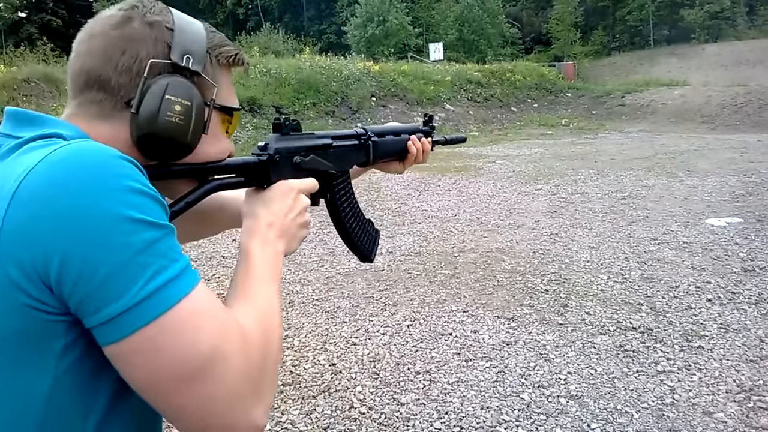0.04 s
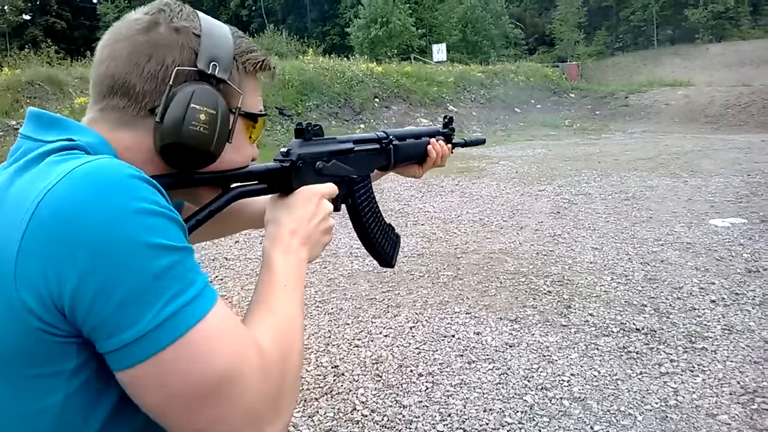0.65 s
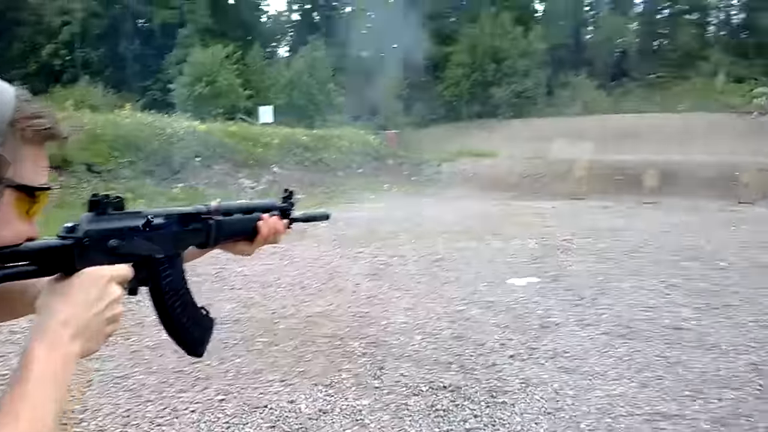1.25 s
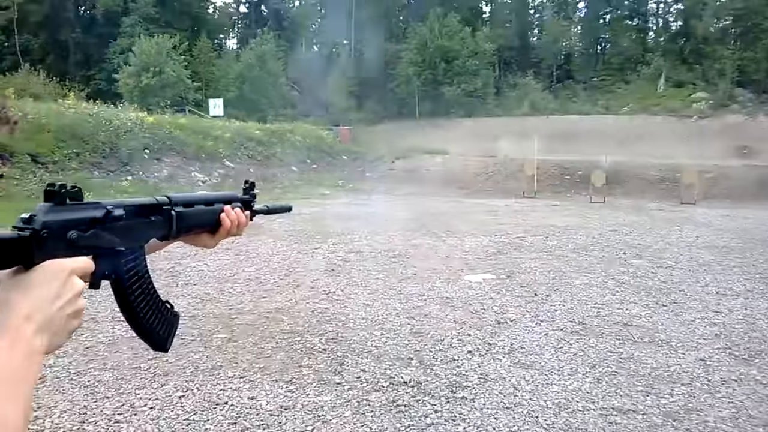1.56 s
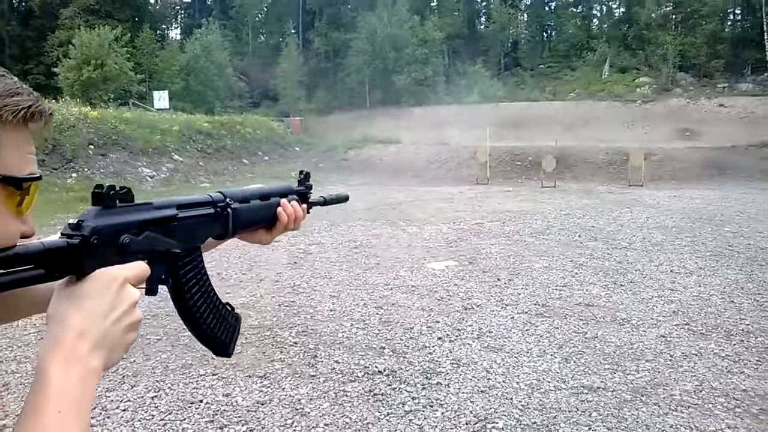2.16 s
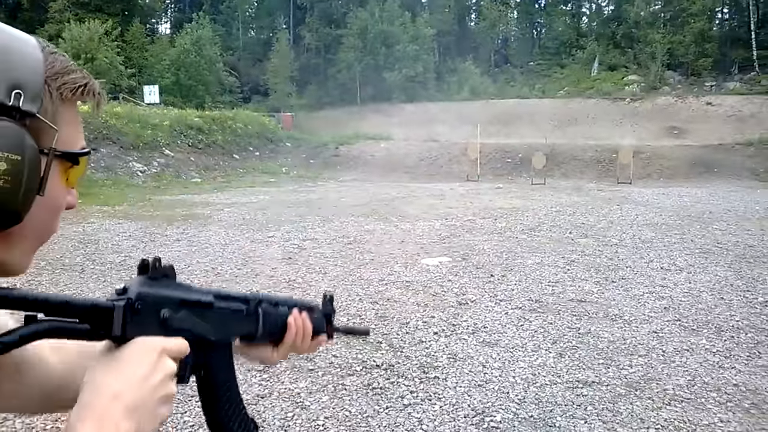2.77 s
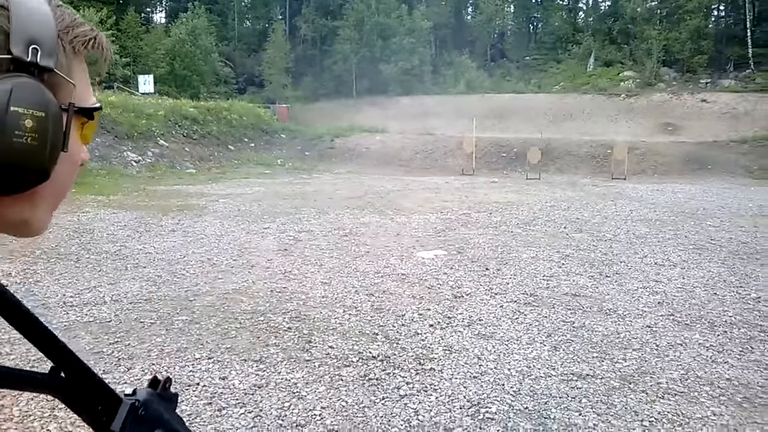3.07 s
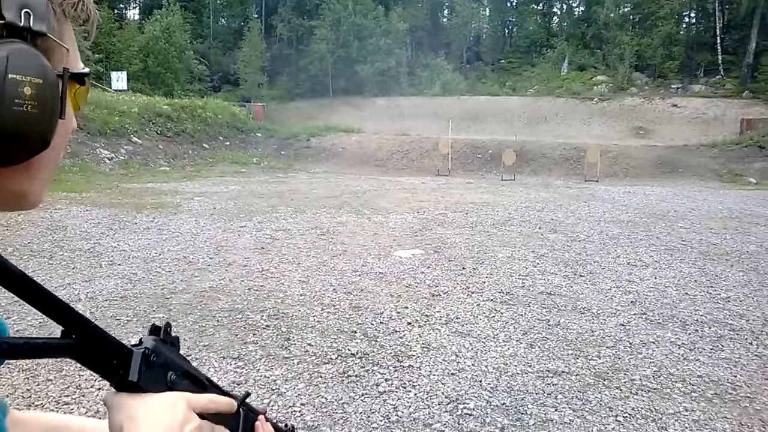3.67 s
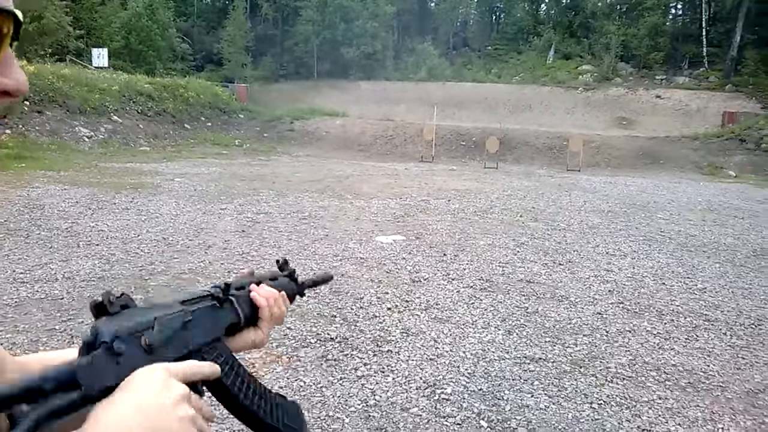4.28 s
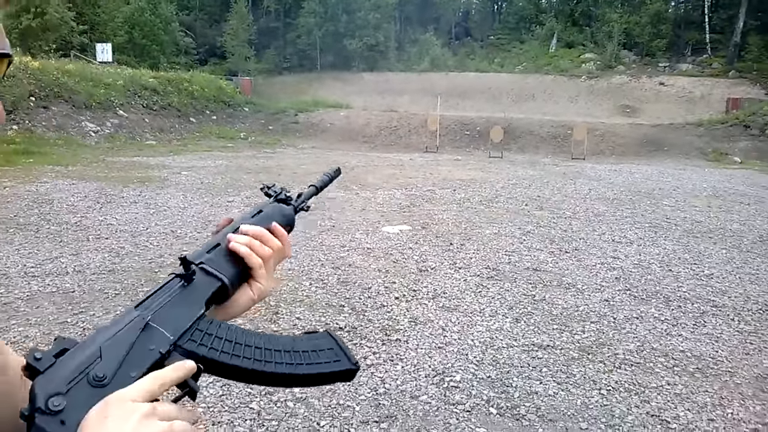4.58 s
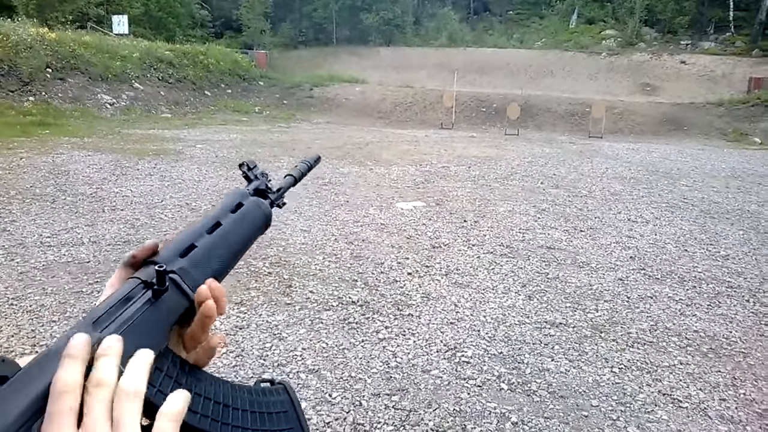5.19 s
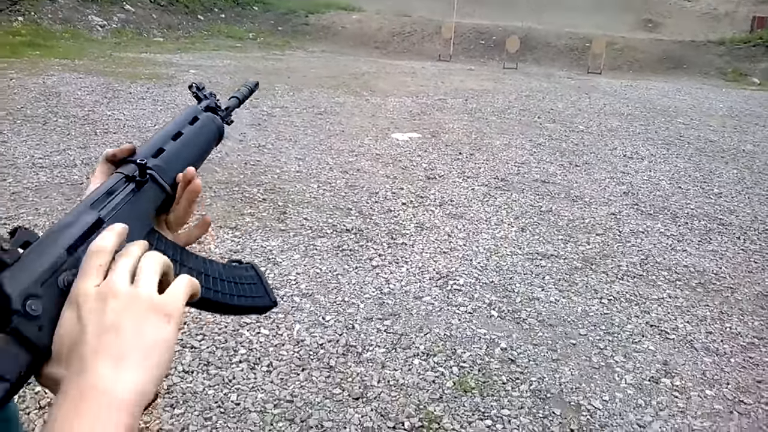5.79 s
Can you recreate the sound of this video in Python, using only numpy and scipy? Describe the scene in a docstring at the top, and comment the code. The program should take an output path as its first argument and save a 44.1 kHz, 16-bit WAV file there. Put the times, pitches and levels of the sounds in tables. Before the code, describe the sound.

Six sharp rifle blasts come in quick succession right next to the microphone, distorting it and echoing from the banks and trees around a gravel range. After the last one there is a knock on the rifle and a faint ring of empty brass landing. The rest is much quieter: hands and sleeves slide over the weapon with light knocks, and a metal lever snaps twice, about a second and a half apart.

```python
"""Six rifle shots on a gravel range, heard from beside the shooter. An earlier shot fades in the trees
as the rifle is shouldered. Each time the hammer falls, the blast overloads the microphone, bounces off
the ground, scatters from gravel and earth banks and rolls back from the forest while the gain recovers.
After the last shot, spent cases tinkle on the gravel. Then the rifle is lowered and handled: hands rub
and knock on it, and a steel lever snaps twice over quiet outdoor air."""
import sys
import numpy as np
from scipy import signal
from scipy.fft import rfft, irfft, next_fast_len
from scipy.io import wavfile
from scipy.ndimage import uniform_filter1d, minimum_filter1d, map_coordinates

SR = 44100
rng = np.random.default_rng(int(sys.argv[2]) if len(sys.argv) > 2 else 0)


def wrap_up_sound(samples):
    """Save the sound to the file named by the first command line argument, as 16-bit audio."""
    columns = np.atleast_2d(samples).T
    # keep every value between -1 and 1, then stretch to whole-number steps
    tamed = np.clip(columns, -1, 1)
    steps = np.round(tamed * 32767).astype(np.int16)
    wavfile.write(sys.argv[1], SR, steps)


N = 266805

# shot cues: t/s, blast/dB, ground bounce/dB, bank scatter/dB, forest echo/dB, hammer/dB
SHOTS = [(.3970, 8, 3.5, 2, -5, -21), (.6420, 5, -3.5, -1, -2, -16), (1.1520, 4, -1, 0, -2.5, -18),
         (1.4550, -3, -9, -4, -5, -16), (1.9123, 3.5, -1.5, -2, -3, -17), (2.3770, -5, -11, -3, -2.5, -13)]
def shots():
    """Each blast and the answer of the range, from near to far."""
    out = np.zeros(N)
    near, far = clock(1), clock(2.3)
    for s, blast_db, ground_db, scatter_db, forest_db, _ in SHOTS:
        add(out, s, amp(blast_db) * muzzle(near) + amp(ground_db) * ground_bounce(near))
        add(out, s, amp(scatter_db) * (banks(near) + sinking_echo(near)))
        add(out, s, amp(forest_db) * forest(far))
    return out


# EQ of the muzzle blast: f/Hz, level/dB
BLAST_EQ = [(59, -38.5), (100, -7), (547, 0.5), (1310, -6), (2080, -0.5), (4870, -8), (5300, -5.5),
            (8460, -18), (10900, -15), (15000, -22.5), (16000, -34)]
def muzzle(t):
    """The ragged pressure front of the muzzle gas."""
    return noise(BLAST_EQ, t) * burst(t, length=.0042)


def ground_bounce(t, lag=.0074, push_s=.00055, swing_hz=48, swing_t60=.055):
    """The gravel returns a rounded blast wave: a short push, a longer suction, a slow swing of air."""
    age = np.maximum(t - lag, 0)
    wave = (1 - age / push_s) * np.exp(-age / push_s / 1.25) * (1 - np.exp(-4 * age / push_s))
    swing = -amp(-18 - 60 * age / swing_t60) * np.sin(2 * np.pi * swing_hz * age)
    return amp(10.5) * wave + swing


# slapbacks from banks and boards: lag/s, level/dB, length/s
SLAPBACKS = [(0.022, -12, .005), (0.0626, 0.5, .0042), (0.068, 0, 0.0046), (0.0946, -8.5, .004),
             (0.104, -8.5, 0.00054), (0.114, -16, .008), (.1305, -1, .0005), (0.1386, -6, 0.00056)]
# EQs of the gravel's hiss and the boom under it: f/Hz, level/dB
GRAVEL_EQ = [(180, -29.5), (300, -0.5), (385, -7.5), (502, -4), (900, -7), (1250, -7), (1360, -7.5),
             (1750, -7.5), (2980, -3), (4160, -6), (4830, -4.5), (6300, -7), (10000, -20), (13300, -19),
             (16000, -30.5)]
BOOM_EQ = [(20, -27), (45, -9), (80, 0), (150, -0.5), (220, -4.5), (320, -1), (400, -7), (520, -2.5),
           (900, -16), (2000, -45.5)]
# their envelopes: peak/s, rise/(dB/s), hold end/s, fall/(dB/s), tail share, tail fall/(dB/s)
HISS_SHAPE = (0.0081, 2100, 0.12, 464, .36, 88)
BOOM_SHAPE = (.009, 800, .122, 250, .26, 60)
def banks(t, side_lag=.06, side_width_s=.017):
    """Countless small reflections with a boom beneath and a few distinct slapbacks on top."""
    swell = np.exp(-((t - side_lag) / side_width_s) ** 2)  # the side bank answers
    slaps = sum(amp(db + 1.7 * rng.standard_normal()) * burst(np.maximum(t - lag, 0), length)
                for lag, db, length in SLAPBACKS)
    hiss_gain = amp(-11.4 + 3.5 * swell + 1.4 * wobble(t, 200)) * envelope(t, HISS_SHAPE)
    hiss = hiss_gain * noise(GRAVEL_EQ, t, grain_db=2.5)
    boom = amp(-22.7 + 4.5 * swell) * envelope(t, BOOM_SHAPE) * noise(BOOM_EQ, t)
    return hiss + boom + slaps * noise(GRAVEL_EQ, t)


def sinking_echo(t, start_hz=300, end_hz=125, centre_s=.21, width_s=.06):
    """Returns from along the bank arrive ever wider apart: a hollow note that sinks."""
    hz = np.interp(t, [.15, .28], [start_hz, end_hz]) * (1 + .17 * wobble(t, 120))
    swell = amp(-34.5 + 2.5 * wobble(t, 70)) * np.exp(-((t - centre_s) / width_s) ** 2)
    return swell * np.sin(2 * np.pi * np.cumsum(hz) / SR)


# EQ of the forest's roll: f/Hz, level/dB
FOREST_EQ = [(100, -23), (300, -15), (430, -6.5), (560, .5), (720, 0), (1000, -5.5), (1500, -4), (2300, -1),
             (3300, -.5), (5500, -4), (7000, -9.5), (8500, -17), (12000, -28), (16000, -39)]
# its envelope: peak/s, rise/(dB/s), hold end/s, fall/(dB/s), tail share, tail fall/(dB/s)
FOREST_SHAPE = (.288, 260, 0.45, 57, .22, 18)
def forest(t, air_loss=4, patchy_db=1.5):
    """The tree line answers with a hollow note; the deeper the path, the more treble the air takes."""
    hz, lag, spectrum = signal.stft(noise(FOREST_EQ, t, grain_db=1), SR, nperseg=512)
    loss_db = air_loss * (hz[:, None] / 1000) ** 1.36 * np.maximum(lag - .38, 0)
    patches = uniform_filter1d(rng.standard_normal(spectrum.shape), size=4, axis=0)
    patches = unit(uniform_filter1d(patches, size=6, axis=1))
    tail = signal.istft(spectrum * amp(patchy_db * patches - loss_db), nperseg=512)[1][:len(t)]
    hollow = noise([(300, -29.5), (500, 0), (720, .5), (1100, -30.5), (3000, -58.5)], t)
    hollow *= amp(-5.5 + 3 * wobble(t, 60)) * np.exp(-((t - .31) / .026) ** 2)
    return (tail + hollow) * envelope(t, FOREST_SHAPE) * amp(-25 + .4 * wobble(t, 40))


# the trigger is let forward and resets: t/s, level/dB
RESETS = [(.5549, -3.5), (.7829, -4.5), (1.7870, -7.5), (2.5519, -5.5)]
# a lever breaks loose and snaps against its stop: t/s, level/dB, magazine send/dB, thud send/dB
LEVER_SNAPS = [(3.8655, -12, -20, -43), (3.8685, -17.5, -19, -39), (5.3967, -39, -8.5, -30),
               (5.4084, -13, -21.5, -35), (5.4106, -9, -12.5, -34)]
def action(hammer_lead_s=.0058):
    """The hammer falls just before each blast, the trigger resets and later the lever snaps."""
    out = np.zeros(N)
    hammers = [(s - hammer_lead_s, db) for s, *_, db in SHOTS]
    for s, db in hammers + list(RESETS):  # shouldered, magazine and stock hardly answer
        add(out, s, amp(db) * steel_hit(magazine_db=-32, thud_db=-36))
    for s, db, magazine_db, thud_db in LEVER_SNAPS:
        add(out, s, amp(db) * steel_hit(magazine_db, thud_db))
    return out


# EQ of the steel's crack: f/Hz, level/dB
STEEL_EQ = [(100, -24), (260, -25), (470, -28), (680, -9.5), (1000, -11), (1350, -15), (2000, -5),
            (3200, -1.5), (4400, -3.5), (5300, 3.5), (6500, 2), (8200, -16), (11500, -17), (16000, -23.5)]
# ring of the steel receiver and the hollow magazine: f/Hz, level/dB, t60/s
RECEIVER_MODES = [(2050, -4, .05), (2400, -4.5, .035), (2510, -3.5, .04), (2610, -9, .06),
                  (3110, -4.5, 0.027), (3860, -2, .03), (4560, -6, 0.027), (5170, 0, 0.027),
                  (5700, -1.5, .035), (6300, 2, .03), (7000, -5.5, 0.035), (11700, -20, .06)]
MAGAZINE_MODES = [(650, -11.5, .03), (744, -5, .04), (865, -4, .05), (930, -5, 0.045), (1007, -4, 0.05)]
def steel_hit(magazine_db, thud_db, crack_t60=.013, wash_t60=.21, thud_t60=.075):
    """Steel meets steel: a crack, a brief ring, a thud in the stock, a bright wash off the gravel."""
    t = clock(.25)
    crack = noise(STEEL_EQ, t, grain_db=2) * amp(1 - 60 * t / crack_t60)
    wash = noise([(1500, -22), (2600, -6), (3500, -10), (5500, 0), (11000, -7.5), (16000, -17)], t)
    wash *= amp(-31.5 - 60 * t / wash_t60)
    thud = noise([(30, -7), (95, 2), (250, -9), (450, -23), (1500, -46)], t)
    thud *= amp(thud_db - 60 * t / thud_t60)
    body = amp(-13) * ring(RECEIVER_MODES, t, vary_db=1)
    body += amp(magazine_db) * ring(MAGAZINE_MODES, t, vary_db=1)
    rattle = amp(2 * wobble(t, 300))  # loose parts chatter as they ring
    attack = 1 - np.exp(-t / .00015)
    return (crack + wash + thud + body * rattle) * attack


# hand strokes, pressing and letting go: t/s, rise/s, release/s, rub/dB, rustle/dB
STROKES = [(3.428, .025, .03, -60, -55), (4.22, .17, .17, -57.5, -68), (4.295, 0.049, 0.032, -56, -52),
           (4.462, .07, 0.054, -69.5, -73), (4.64, 0.084, .19, -61, -69), (4.965, .13, .08, -68, -75),
           (5.18, .1, .12, -81, -92), (5.9, 0.03, 0.019, -59, -55), (5.935, .04, 0.12, -61, -88),
           (6.045, 0.042, .05, -50, -55)]
# featured knocks on the hand-guard: t/s, level/dB, bright edge/dB
KNOCKS = [(.068, -50, -30), (2.958, -26, -31), (4.1057, -49, -20), (4.1957, -48.5, -2), (4.289, -38, -10),
          (4.577, -55, -2), (4.6086, -48, -10), (4.625, -45, -12), (4.6577, -42, -20), (4.6887, -45, -17),
          (4.7136, -46, -16), (4.85, -55, -6), (5.82, -66, 7), (6.016, -42, -6)]
# EQs of the hands' rub and the sleeves' rustle: f/Hz, level/dB
RUB_EQ = [(100, -36), (300, -31), (900, -18), (1550, -16), (1950, 4.5), (2250, -2), (2900, -18),
          (4000, -11), (5000, -22), (7000, -42.5)]
RUSTLE_EQ = [(1200, -15), (2500, 1), (4000, -3), (6000, -6), (9000, -11), (13000, -22), (16000, -32)]
def handling(rub_depth_db=20.5, slips=70, pitch_spread=.06):
    """Hands and sleeves slip over the rifle in small grains; the grip catches and knocks at times."""
    t, rub, rustle = np.arange(N) / SR, np.zeros(N), np.zeros(N)
    for s, rise, release, rub_db, rustle_db in STROKES:
        press_db = -rub_depth_db * ((t - s) / np.where(t < s, rise, release)) ** 2
        rub += amp(rub_db + press_db)
        rustle += amp(rustle_db + 1.25 * press_db)  # swings wider than the rub
    flutter = amp(2.9 * wobble(t, 110))
    out = flutter * (rub * noise(RUB_EQ, t, grain_db=4.5) + rustle * noise(RUSTLE_EQ, t, grain_db=8))
    for s, db, bright_db in KNOCKS:
        add(out, s, amp(db) * knock(bright_db, np.exp(pitch_spread * rng.standard_normal())))
    slip_times = rng.uniform(STROKES[0][0] - STROKES[0][1], t[-1], slips)
    for s, (size, detune) in zip(slip_times, rng.standard_normal((slips, 2))):
        gain = np.interp(s, t, rub) * amp(4 + 3.5 * size)  # chance slips ride on the rub's level
        add(out, s, gain * knock(bright_db=-12, pitch=np.exp(pitch_spread * detune)))
    return out


def knock(bright_db, pitch):
    """A short knock on the hand-guard with a bright edge."""
    t = clock(.1)
    body = noise([(hz * pitch, db) for hz, db in RUB_EQ], t) * amp(-60 * t / .022)
    edge = noise(RUSTLE_EQ, t) * amp(bright_db - 60 * t / .019)
    return body + edge


# soft bumps of stock and hands: t/s, level/dB, t60/s
BUMPS = [(.005, -46, .15), (5.017, -65, 0.11), (5.286, -62.5, 0.089), (5.895, -59.5, .12)]
def bumps():
    """Stock and palms meet the body with dull bumps; cloth brushes as the rifle is shouldered."""
    out, t = np.zeros(N), clock(.3)
    dull_eq = [(80, -9), (280, 1.5), (650, -1.5), (1100, -1.5), (2000, -26), (6000, -48)]
    for s, db, t60 in BUMPS:
        add(out, s, noise(dull_eq, t) * amp(db - 60 * t / t60))
    cloth = noise([(1500, -8), (2500, 2), (5000, 0), (7000, -6), (12000, -21)], t, grain_db=3)
    add(out, BUMPS[0][0], cloth * amp(-58.5) * burst(t, length=.049))
    return out


# spent cases landing: t/s, level/dB
CASE_DROPS = [(2.9870, -57), (3.365, -64), (3.395, -67)]
# their tinkle: f/Hz, level/dB, t60/s
BRASS_MODES = [(12750, -3, .11), (12930, -9, .09)]
def cases():
    """Empty brass lands on the gravel with a tick and a thin ring."""
    out, t = np.zeros(N), clock(.2)
    for s, db in CASE_DROPS:
        tinkle = ring(BRASS_MODES, t, vary_db=0)
        tick = noise(RUSTLE_EQ, t) * amp(9 - 60 * t / .011)
        add(out, s, amp(db) * (tinkle + tick))
    return out


# a palm gliding over smooth steel: t/s, level/dB, half length/s
GLIDES = [(4.98, -83, 0.022), (5.65, -66, 0.053)]
def glides():
    """Skin slides over the receiver with a soft, high hiss and stirs its ring a little."""
    t = np.arange(N) / SR
    swell = sum(amp(db) * np.exp(-((t - s) / half) ** 2) for s, db, half in GLIDES)
    eq = [(1200, -6), (1900, -1), (2400, 9), (3000, -8), (7000, -3), (9000, 5), (11000, -5), (15000, -22)]
    return swell * noise(eq, t)


# EQ of the outdoor bed: f/Hz, level/dB
AIR_EQ = [(25, -9.5), (50, 0), (75, -8), (130, -15), (300, -20.5), (700, -20), (1300, -22.5), (2100, -23),
          (3200, -29), (5800, -28.5), (7000, -34), (16000, -43)]
def outdoors(earlier_shot_s=1.7):
    """Quiet air with a low, far rumble, and the last of an earlier shot still in the trees."""
    t = np.arange(N) / SR
    out = amp(-75 + .7 * wobble(t, 3)) * noise(AIR_EQ, t)
    add(out, 0, forest(clock(earlier_shot_s + .5))[int(earlier_shot_s * SR):])
    return out


def amp(db):
    """Decibels to gain."""
    return 10 ** (np.asarray(db) / 20)


def unit(x):
    """Scaled to rms 1."""
    return x / np.sqrt(np.mean(x ** 2) + 1e-20)


def clock(seconds):
    """Sample times from zero."""
    return np.arange(int(seconds * SR)) / SR


def add(track, s, x):
    """Mix x into the track from time s on."""
    part = track[max(round(s * SR), 0):][:len(x)]
    part += x[:len(part)]


def wobble(t, rate):
    """A smooth random curve, rate knots a second."""
    return map_coordinates(rng.standard_normal(int(t[-1] * rate) + 4), [t * rate])


def noise(eq, t, grain_db=0):
    """Noise of rms 1 through an EQ of (f/Hz, level/dB) points; grain_db breaks it into uneven grains."""
    size = next_fast_len(len(t))
    white = rng.standard_normal(len(t)) * amp(grain_db * wobble(t, 1500))
    hz, db = np.transpose(eq)
    curve_db = np.interp(np.log(np.fft.rfftfreq(size, 1 / SR) + 1), np.log(hz + 1), db)
    return unit(irfft(rfft(white, size) * amp(curve_db), size)[:len(t)])


def burst(t, length):
    """A short, flat-topped envelope."""
    return (1 - np.exp(-t / .0002)) * np.exp(-np.minimum(t / length, 10) ** 4)


def envelope(t, shape):
    """Attack, hold, then a fast release with a share that lingers as a tail."""
    peak_s, rise, hold_end_s, fall, share, tail_fall = shape
    attack = amp(-rise * np.maximum(peak_s - t, 0))
    after = np.maximum(t - hold_end_s, 0)
    return attack * ((1 - share) * amp(-fall * after) + share * amp(-tail_fall * after))


def ring(modes, t, vary_db):
    """Damped modes, struck a little differently each time."""
    return sum(amp(db + vary_db * rng.standard_normal() - 60 * t / t60)
               * np.sin(2 * np.pi * (hz * t + rng.random())) for hz, db, t60 in modes)


def scene():
    """Everything that reaches the microphone, in mono."""
    return (shots() + action() + cases() + handling() + glides() + bumps() + outdoors())[None]


def record(dry, overload_db=9, ceiling_db=-3, recovery_db_per_s=25, top_hz=16000):
    """The microphone saturates; a limiter ducks at once and recovers slowly; a high cut follows."""
    saturated = dry / (1 + (dry / amp(overload_db)) ** 4) ** (1 / 4)
    recovered_db = recovery_db_per_s * np.arange(N) / SR
    excess_db = np.maximum(20 * np.log10(np.abs(saturated[0]) + 1e-9) - ceiling_db, 0)
    duck_db = np.maximum.accumulate(excess_db + recovered_db) - recovered_db
    gain = uniform_filter1d(minimum_filter1d(amp(-duck_db), size=65), size=65)
    high_cut = signal.ellip(10, .1, 80, top_hz, fs=SR, output="sos")
    return signal.sosfilt(high_cut, saturated * gain)


dry = scene()
out = record(dry)
wrap_up_sound(out)
```